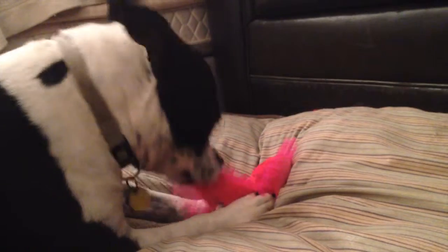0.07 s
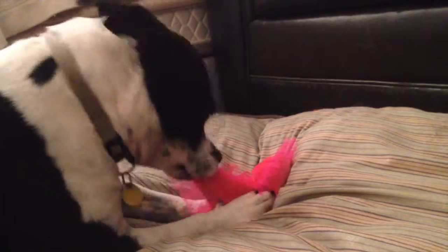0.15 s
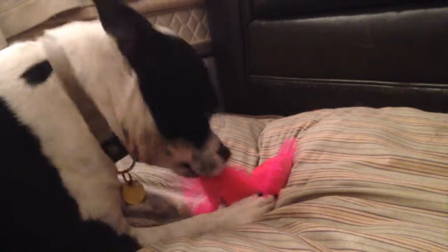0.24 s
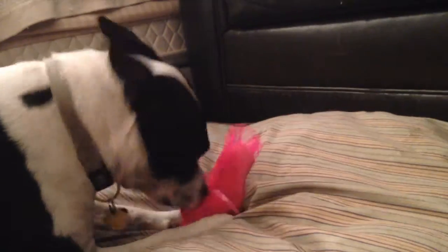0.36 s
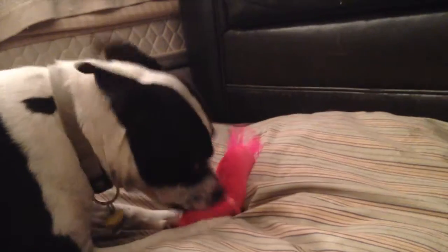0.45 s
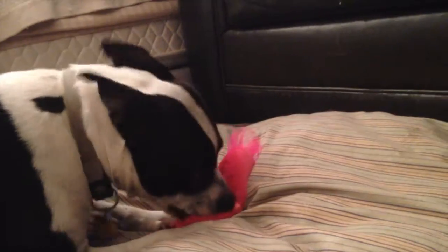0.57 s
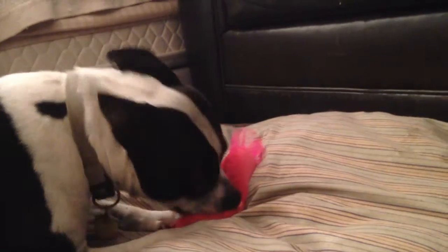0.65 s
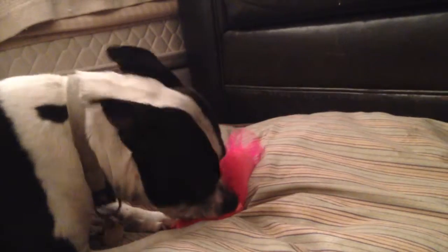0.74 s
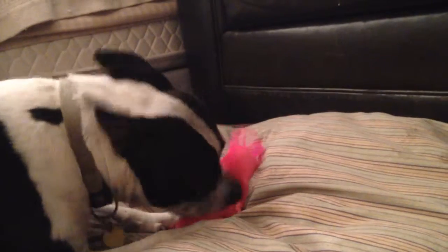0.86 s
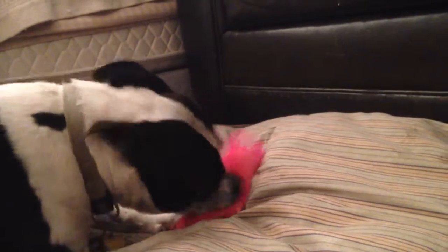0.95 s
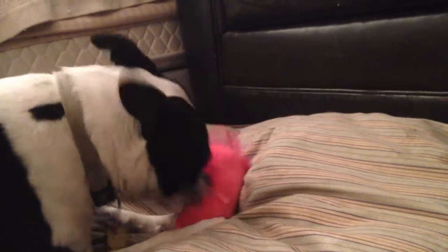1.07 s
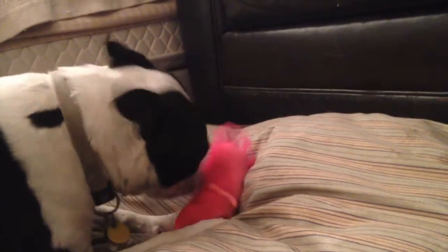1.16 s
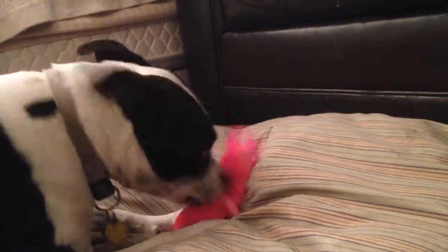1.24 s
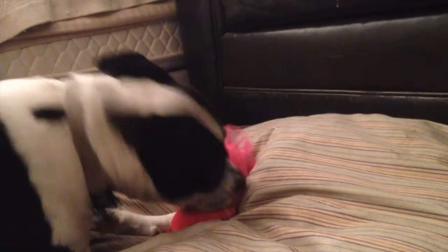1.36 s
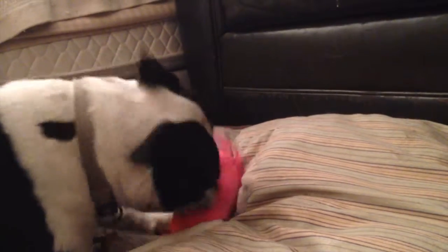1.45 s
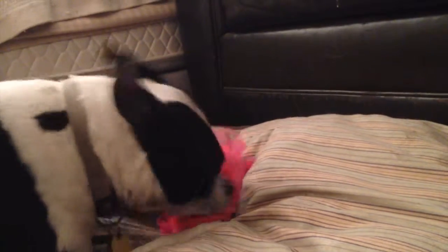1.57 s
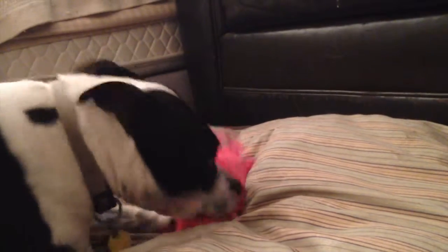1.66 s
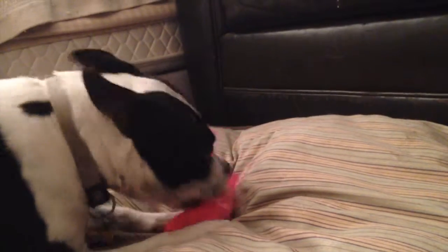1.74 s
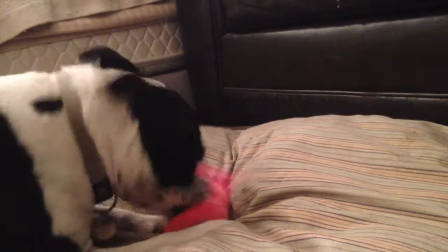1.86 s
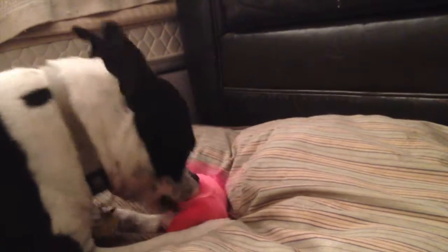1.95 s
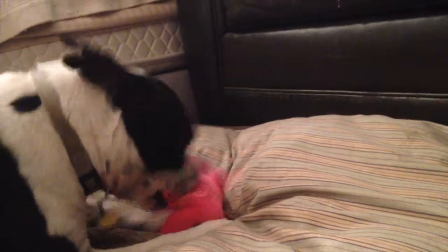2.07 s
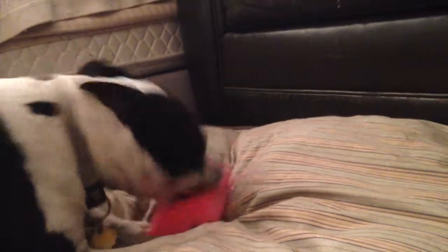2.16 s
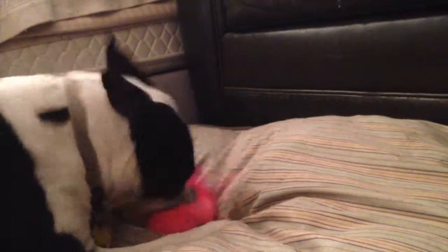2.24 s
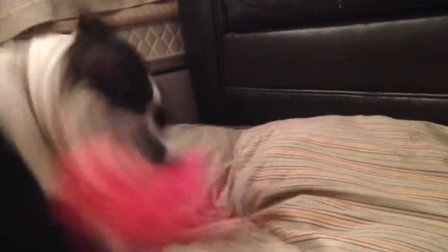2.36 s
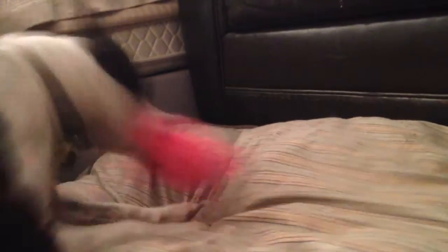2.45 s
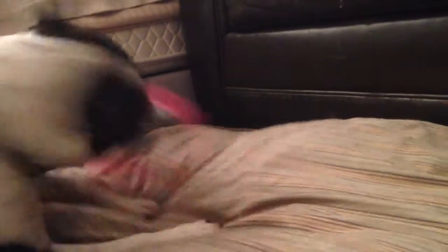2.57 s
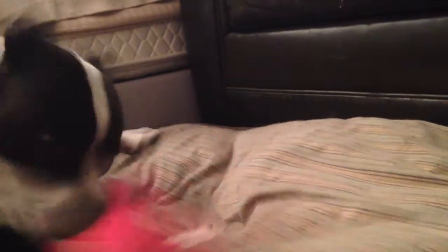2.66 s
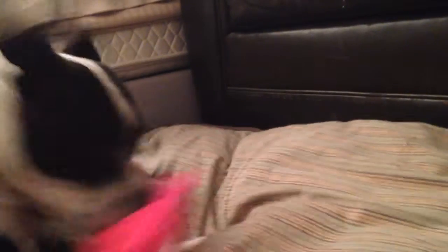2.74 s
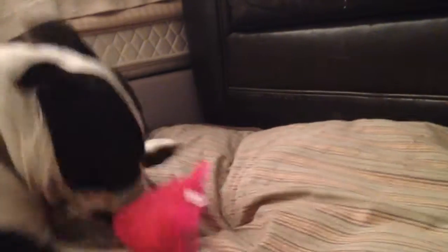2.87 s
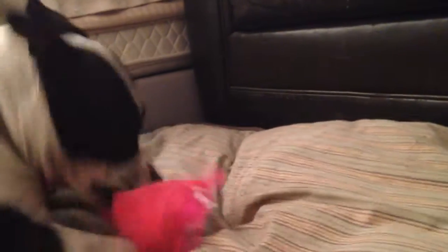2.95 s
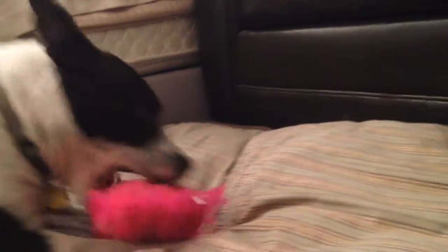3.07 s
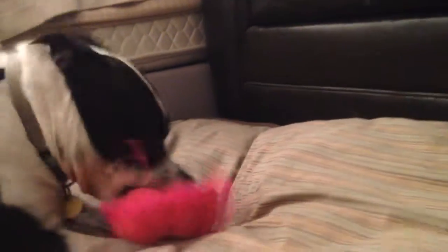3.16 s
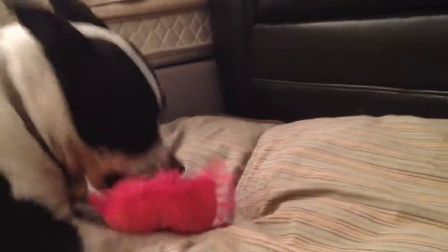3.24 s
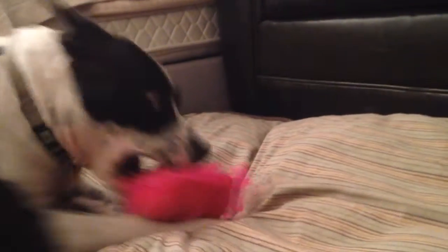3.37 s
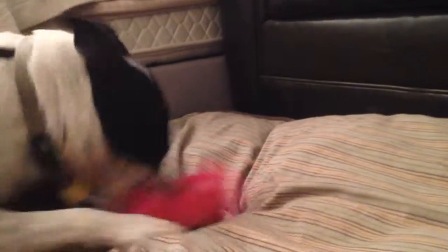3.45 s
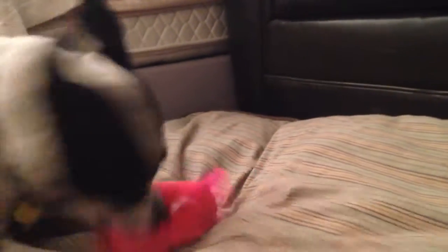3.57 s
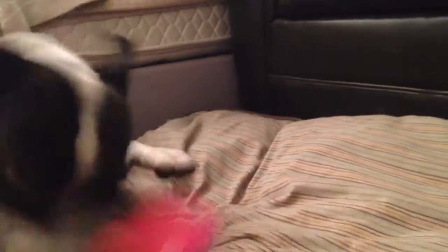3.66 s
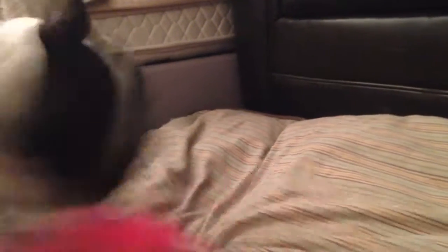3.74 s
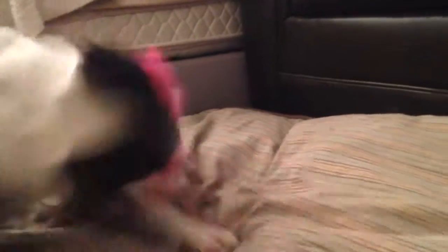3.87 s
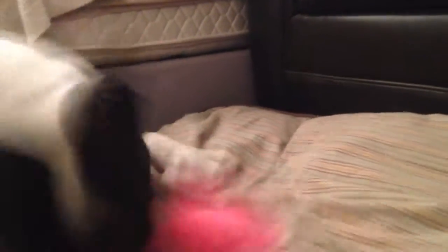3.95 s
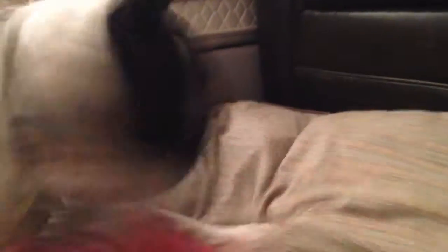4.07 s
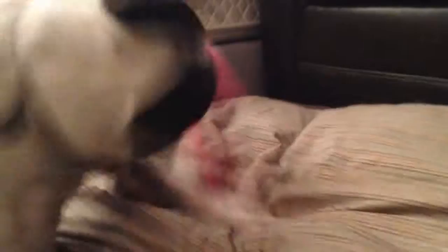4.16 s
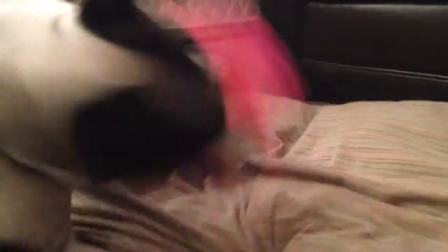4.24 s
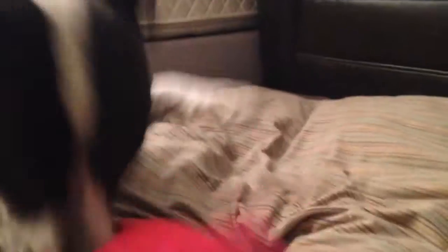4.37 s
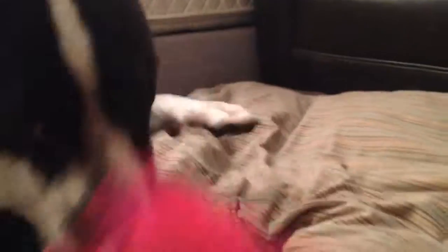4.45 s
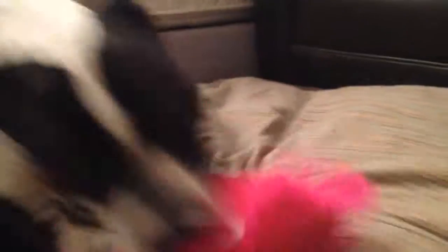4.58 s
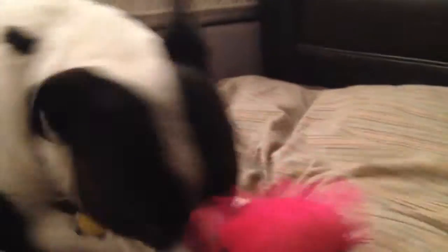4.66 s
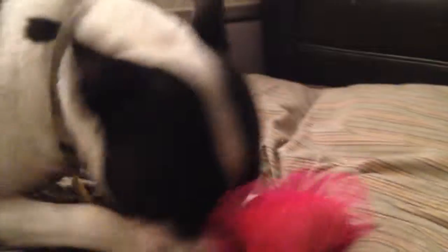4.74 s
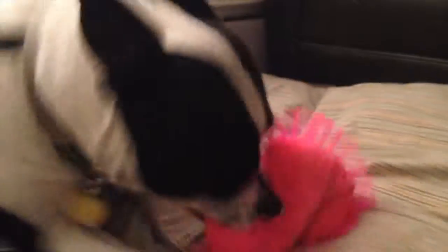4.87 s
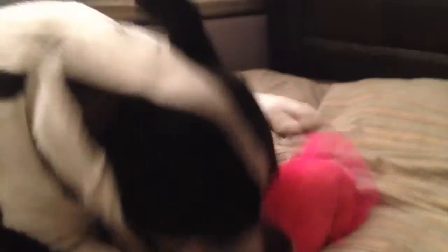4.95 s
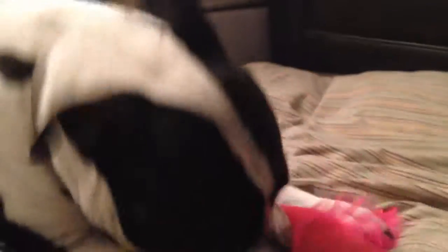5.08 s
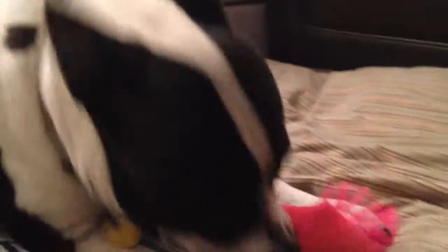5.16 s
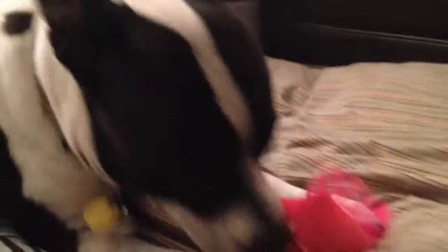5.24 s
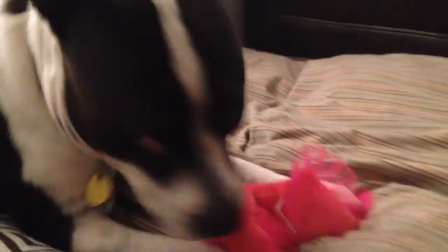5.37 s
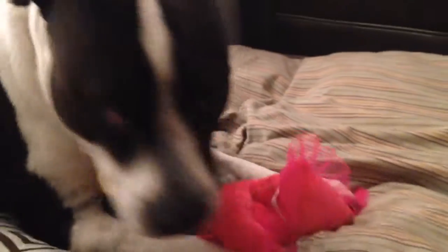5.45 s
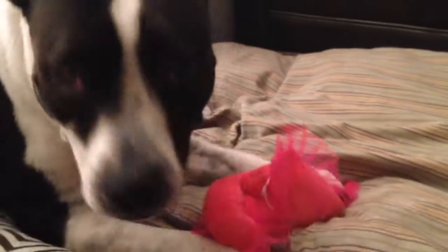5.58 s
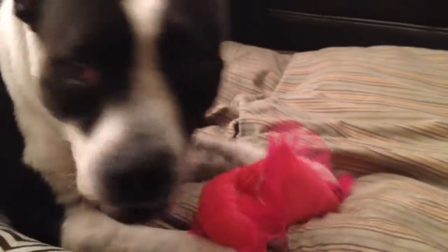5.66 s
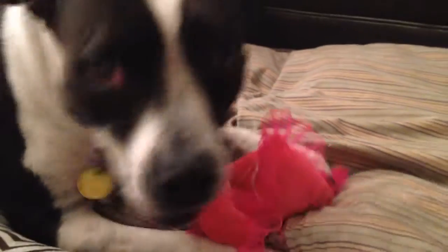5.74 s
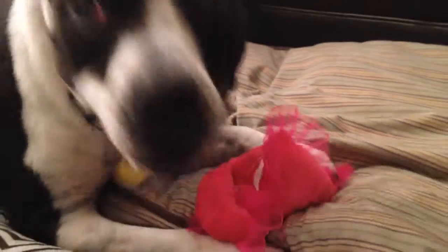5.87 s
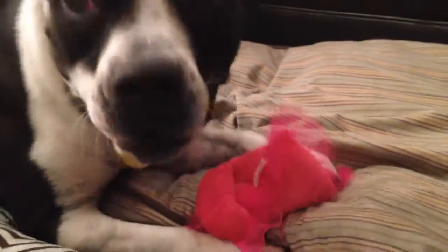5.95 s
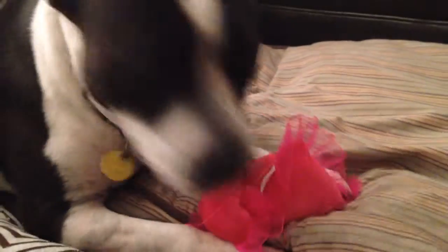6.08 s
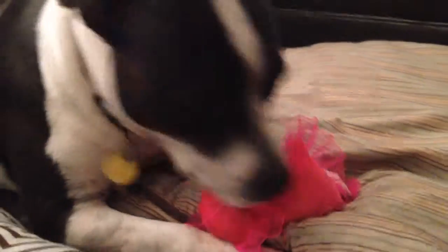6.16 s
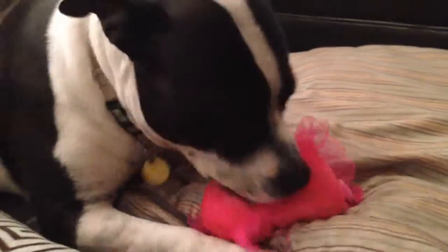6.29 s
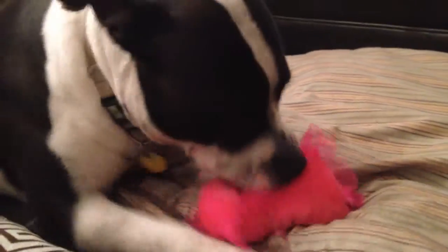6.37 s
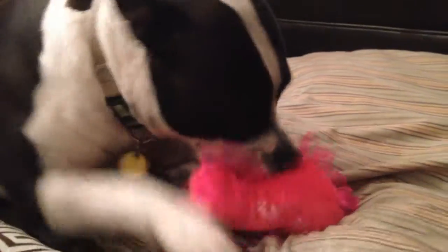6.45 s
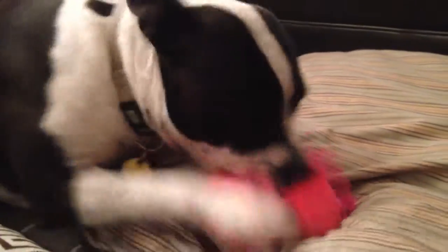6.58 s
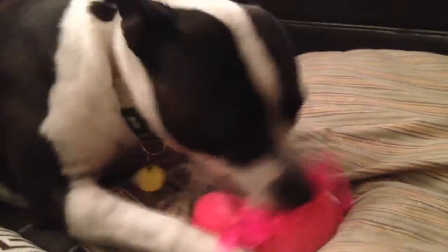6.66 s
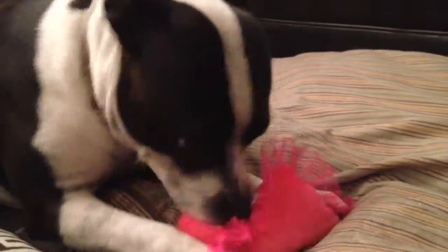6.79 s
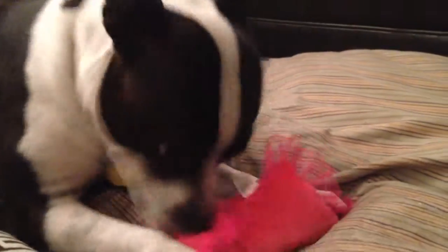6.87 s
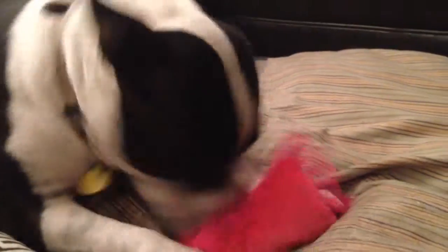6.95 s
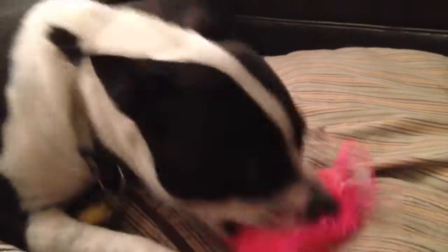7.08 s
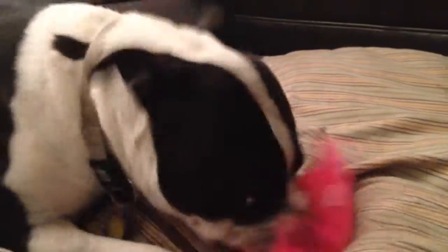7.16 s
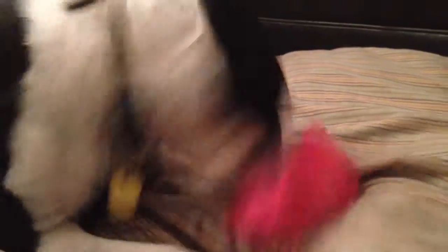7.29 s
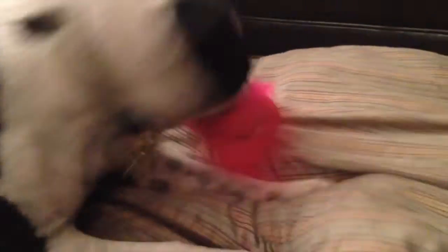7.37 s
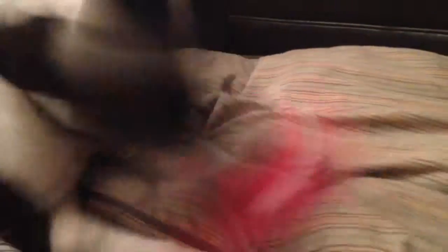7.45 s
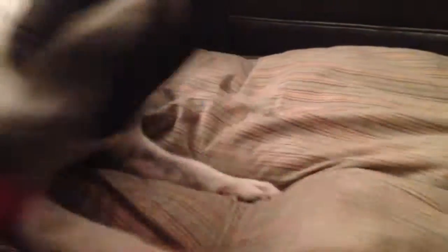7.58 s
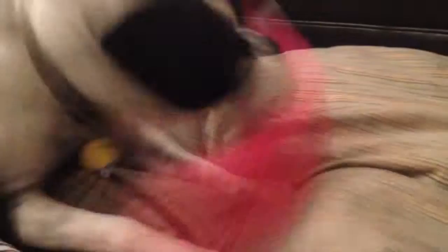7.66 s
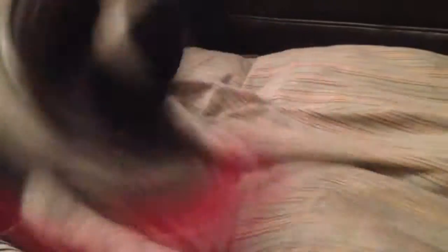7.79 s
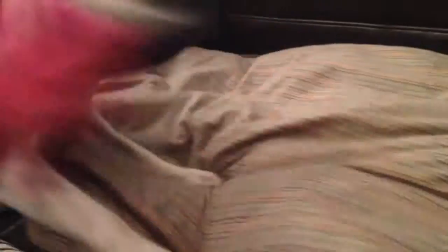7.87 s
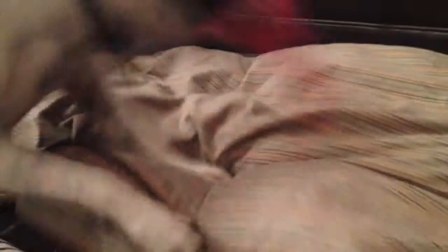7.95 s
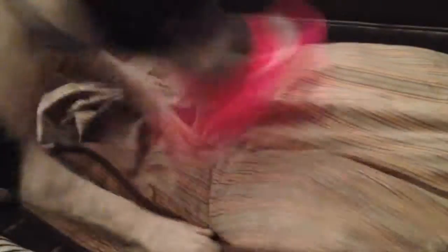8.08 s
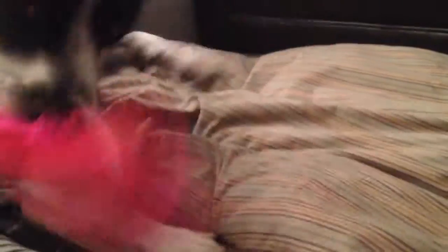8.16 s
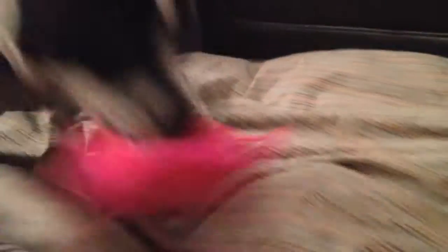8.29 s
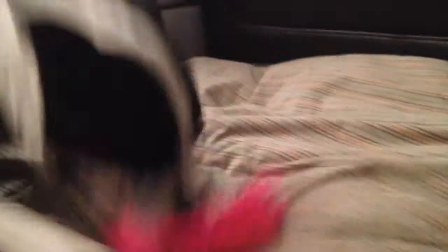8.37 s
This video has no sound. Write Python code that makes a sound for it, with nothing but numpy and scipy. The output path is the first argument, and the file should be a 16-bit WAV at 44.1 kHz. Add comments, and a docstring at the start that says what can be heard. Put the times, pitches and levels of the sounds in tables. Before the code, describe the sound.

Close, dry indoor pickup with low steady hiss and a short soft room tail. A faint jaw smack at 0.1 s and a soft nasal snort up to 0.4 s open. From 0.6 to 2.3 s small, bright collar-tag clinks come irregularly, with a faint bedding thump at 1.1. At 2.4-2.8 s a hard shake brings dense sharp jangling, dull toy slaps, cloth rustle and mattress thumps. Light clinks follow until a thump at 3.6, then renewed shaking from 3.8 to 4.4 s with loud ringing tags and heavy padded thuds; more jangles run from 4.7 to 5.2. A stronger airy snort comes at 5.2-5.5 s. It is then nearly quiet, with jaw clicks at 5.7-5.9 and 6.3-6.6. Clinks return at 6.7; from 7.1 the shaking builds, the fiercest rustle and jangle around 7.6, thumps near 8, and a loud clash at 8.1 before the end.

```python
"""A dog on a soft bed close by chews and shakes a plush toy, over a quiet room hiss of shaped noise.
A jaw smack (noise burst through two resonances) and a soft snort (noise through nostril resonances) open.
Collar tags (damped modes and a noise crack) clink from 0.6 s and ring harder in a shake from 2.4 to 5.2 s,
as cloth rustles (swelling noise) and the mattress thumps (low damped modes); a second snort follows.
A sparse stretch of clinks and smacks leads to another hard shake from 7 s to the end."""
import sys
import numpy as np
from scipy import signal
from scipy.fft import rfft, irfft, next_fast_len
from scipy.io import wavfile
from scipy.ndimage import uniform_filter1d, map_coordinates

SR = 44100
rng = np.random.default_rng(int(sys.argv[2]) if len(sys.argv) > 2 else 0)


def pcm_store(signal):
    """Save signal as 16-bit PCM."""
    levels = np.round(np.clip(np.atleast_2d(signal), -1, 1) * 32767)
    wavfile.write(sys.argv[1], SR, levels.astype(np.int16).T)


N = 371322


def amp(db):
    """Decibels to gain."""
    return 10 ** (np.asarray(db) / 20)


def unit(x):
    """Scaled to rms 1."""
    return x / np.sqrt(np.mean(x ** 2) + 1e-20)


def along(points, hz):
    """Interpolates (Hz, value) points on a log frequency axis."""
    f, v = np.transpose(points)
    return np.interp(np.log(hz + 1), np.log(f + 1), v)


def wobble(knots_per_s):
    """A smooth random curve through random knots."""
    knots = rng.standard_normal(int(N * knots_per_s / SR) + 4)
    return map_coordinates(knots, [np.arange(N) * knots_per_s / SR])


def filtered(x, response):
    """x through a complex response of frequency."""
    m = next_fast_len(N + SR // 2)
    return irfft(rfft(x, m) * response(np.fft.rfftfreq(m, 1 / SR)), m)[:N]


def rush(response, patchy_db):
    """Filtered noise of rms 1, its gain random in patches of time and frequency."""
    z = signal.stft(rng.standard_normal(N), nperseg=256)[2]
    field = uniform_filter1d(rng.standard_normal(z.shape), size=5, axis=0)
    field = uniform_filter1d(field, size=8, axis=1)
    patchy = signal.istft(z * amp(patchy_db * unit(field)), nperseg=256)[1][:N]
    return unit(filtered(patchy, response))


def add(track, s, sound):
    """Mixes a short sound in at s seconds."""
    part = track[round(s * SR):][:len(sound)]
    part += sound[:len(part)]


def ring(t, hz, t60_s, attack_s):
    """A damped mode with a short rise."""
    return np.sin(2 * np.pi * hz * t) * amp(-60 * t / t60_s) * (1 - np.exp(-t / attack_s))


# Hiss spectrum. Each row: frequency in Hz, relative level in dB.
HISS_SHAPE = [(15, -73), (25, -8.5), (81, 11), (328, -7), (396, -3.5), (2000, -12), (15200, -21)]
HISS_RMS_DB = -58.5


def hiss():
    """Room and microphone hiss: steady shaped noise."""
    return amp(HISS_RMS_DB) * rush(lambda hz: amp(along(HISS_SHAPE, hz)), patchy_db=2.4)


# Snorts. Each row: start in seconds, rise in seconds, fall in seconds, peak gain in dB, loss over the fall in dB.
SNORTS = [(.14, 0.14, 0.16, -47.5, 5.5), (5.193, 0.077, 0.25, -38.5, 18)]
SNORT_RISE_DB = 14.5


def breath():
    """Gain per sample of the snorts: rise and fall linear in dB, then cut."""
    t = np.arange(N) / SR
    gain = np.zeros(N)
    for s, rise_s, fall_s, db, loss_db in SNORTS:
        times = [s, s + rise_s, s + rise_s + fall_s]
        levels = [db - SNORT_RISE_DB, db, db - loss_db]
        gain += amp(np.interp(t, times, levels, left=-140, right=-140))
    return gain


# Nostril resonances. Each row: center in Hz, width in Hz, level in dB.
NOSTRIL_MODES = [(1480, 400, -7), (3710, 980, -1), (5640, 960, -6.5)]


def nostrils(hz):
    """Resonances of alternating sign plus a dull direct path."""
    total = amp(-3.5) / (1 + 1j * hz / 3500)
    for k, (center, width, db) in enumerate(NOSTRIL_MODES):
        band = 1j * hz * width / (center * center - hz * hz + 1j * hz * width)
        total = total + (-1) ** k * amp(db) * band
    return total


def nose():
    """Air forced through the nostrils hisses in their resonances."""
    return breath() * rush(nostrils, patchy_db=1.5)


# Toy swings over the bedding. Each row: loudest moment in seconds, rise in seconds, fall in seconds, gain in dB.
SWINGS = [(2.463, 0.073, 0.19, -40.5), (2.575, 0.086, 0.072, -45.5), (2.733, 0.099, 0.085, -47),
          (3.759, 0.1, 0.2, -44.5), (4.12, 0.51, 0.38, -48), (4.964, 0.2, 0.19, -54.5),
          (7.345, 0.049, 0.06, -53), (7.432, 0.043, 0.088, -38), (7.586, 0.078, 0.064, -33.5),
          (7.77, 0.19, 0.066, -48.5), (7.877, 0.029, 0.065, -49), (8.157, 0.38, 0.088, -46.5),
          (8.32, 0.099, 0.11, -54.5)]
SLOPE_DB = 17.5  # lost one rise before and one fall after the loudest moment


def swings():
    """Gain per sample: each swing swells and fades on a bell in dB."""
    t = np.arange(N) / SR
    gain = np.zeros(N)
    for s, rise_s, fall_s, db in SWINGS:
        offset = (t - s) / np.where(t < s, rise_s, fall_s)
        gain += amp(db - SLOPE_DB * offset ** 2)
    return gain


# Cloth spectrum. Each row: frequency in Hz, relative level in dB.
CLOTH_SHAPE = [(290, -9.5), (1300, -2.5), (3200, -4), (5430, -7), (12900, -15), (15500, -23)]


def rustle(stroke):
    """Cloth drags over cloth: grainy noise, brighter when louder."""
    grain = amp(2.6 * wobble(30) + 2.5 * wobble(400))
    dull = rush(lambda hz: amp(along(CLOTH_SHAPE, hz)) / (1 + (hz / 6000) ** 2), patchy_db=3.2)
    bright = rush(lambda hz: amp(along(CLOTH_SHAPE, hz)) / (1 + (5000 / (hz + 1)) ** 2), patchy_db=3.5)
    return unit(grain) * (stroke * dull + amp(22) * stroke ** 1.357 * bright)


CRACKLE_PER_S, CRACKLE_DB = 300, -3  # mean rate; level relative to the swing gain


def crackle():
    """Sparse fibre snaps of very uneven size, band-passed, rms 1."""
    when, size = rng.random(N), rng.standard_normal(N)
    snaps = (when < CRACKLE_PER_S / SR) * size * amp(4 * rng.standard_normal(N))
    return unit(filtered(snaps, lambda hz: 1j * hz / (1500 + 1j * hz) / (1 + 1j * hz / 7000)))


# Padded flapping spectrum. Each row: frequency in Hz, relative level in dB.
MATTRESS_SHAPE = [(20, -62.5), (45, -26), (62, 1.5), (85, -4), (146, -12), (1200, -29.5), (2640, -120)]
FLAP_DB, FLAP_EXPONENT = -13.5, 0.59  # exponent: how far it follows the swing gain


def flapping(stroke):
    """Padded low noise that follows the swings less steeply than the rustle."""
    rumble = rush(lambda hz: amp(along(MATTRESS_SHAPE, hz)), patchy_db=5.5)
    return amp(FLAP_DB) * stroke ** FLAP_EXPONENT * rumble


# Toy and paws landing. Each row: start in seconds, level in dB before THUMP_GAIN_DB, frequency in Hz.
THUMPS = [(1.124, -48, 91), (2.455, -33, 96), (2.531, -30, 98.5), (3.6, -36, 86), (3.807, -26.5, 91),
          (4.018, -27.5, 86.5), (4.116, -24.5, 77), (4.632, -29.5, 86.4), (4.954, -28, 88.5),
          (7.934, -21.5, 87), (8.052, -28, 110.7)]
THUMP_GAIN_DB = 22


def thumps():
    """The mattress answers each landing with a low damped swing and its overtone."""
    out, t = np.zeros(N), np.arange(SR // 3) / SR
    for s, db, hz in THUMPS:
        swing = ring(t, hz, t60_s=0.12, attack_s=0.022)
        overtone = 0.19 * ring(t, 1.9 * hz, t60_s=0.08, attack_s=0.018)
        add(out, s, amp(db + THUMP_GAIN_DB) * (swing + overtone) * (1 - np.exp(-t / 0.016)))
    return out


def bedding():
    """Rustle, fibre snaps and flapping share the swing gain; thumps are added."""
    stroke = swings()
    return rustle(stroke) + amp(CRACKLE_DB) * stroke * crackle() + flapping(stroke) + thumps()


# Jaw smacks and toy slaps. Each row: start in seconds, knock peak in dB, frequency in Hz.
SMACKS = [(0.076, -38, 1620), (2.416, -24.5, 433), (2.551, -18.5, 303), (2.72, -23, 510),
          (3.77, -28.5, 456), (4.022, -22.5, 387), (4.047, -25, 2900), (4.368, -22, 670),
          (4.612, -28.5, 583), (5.714, -40, 1950), (5.8527, -25.5, 1574), (6.318, -35.5, 541),
          (6.624, -39.5, 1994), (6.988, -34, 2470), (7.106, -29, 422), (7.31, -35.5, 415),
          (7.786, -24.5, 1660), (7.858, -23.5, 388), (8.097, -27, 2800), (8.209, -21, 2080)]


def jaws():
    """A noise burst knocks through two broad cavity resonances, with a crisp snap on top."""
    out, t = np.zeros(N), np.arange(SR // 16) / SR
    for s, db, hz in SMACKS:
        burst = rng.standard_normal(len(t)) * amp(-60 * t * (hz + 400) / 30)  # deeper knocks last longer
        cavity = ring(t, hz, 6 / hz, 0.000094) + 0.46 * ring(t, 0.45 * hz, 8 / hz, 0.00076)
        knock = np.convolve(burst, cavity)[:len(t)]
        snap = uniform_filter1d(burst, size=19) - uniform_filter1d(burst, size=150)
        snap = snap * amp(-60 * t / 0.011)
        add(out, s, amp(db) * (knock / np.abs(knock).max() + 1.6 * snap))
    return out


def choke(t):
    """Full ring until the tag meets the fur, a faint one after."""
    touch_s = 0.011 * amp(2.2 * rng.standard_normal())
    return 0.13 + 1 / (1 + np.exp(np.clip((t - touch_s) / 0.002, -30, 30)))


MAIN_HZ, MAIN_T60_S = 9350, 0.13  # rung by every contact
# Quickly damped side modes of the tags. Each entry: frequency in Hz.
SIDE_HZ = [5590, 5945, 6570, 7245, 13440, 13970, 14350]
SIDE_DB, SIDE_T60_S = -9, 0.026  # level relative to the contact


def clink(t, main_db, crack_db):
    """One contact: a bright crack, the main mode, and side modes struck anew each time."""
    strike, detune = rng.standard_normal((2, len(SIDE_HZ), 1))
    skid = amp(crack_db - 60 * t / 0.009) * (1 - np.exp(-t / 0.0004))
    crack = skid * np.diff(rng.standard_normal(len(t) + 1))
    share = amp(11 * strike)
    side_hz = np.c_[SIDE_HZ] * (1 + 0.012 * detune)
    side = np.sum(share * ring(t, side_hz, SIDE_T60_S, 0.0001), axis=0) / np.linalg.norm(share)
    main_hz = MAIN_HZ * (1 + 0.0018 * rng.standard_normal())
    main = choke(t) * ring(t, main_hz, MAIN_T60_S, 0.0001)
    return crack + amp(SIDE_DB) * side + amp(main_db) * main


FIDGETS_PER_S, FIDGET_DB = 30, -57  # mean rate; base level outside the swings


def fidgets():
    """Faint stray touches of the tags scattered around the contacts, harder during a shake."""
    out, t, shaking = np.zeros(N), np.arange(SR // 16) / SR, swings()
    for pick, when, size in rng.random((round(FIDGETS_PER_S * N / SR), 3)):
        s = CLINKS[int(pick * len(CLINKS))][0] + 0.3 * (when - 0.4)
        force = amp(FIDGET_DB) + amp(5) * shaking[min(round(s * SR), N - 1)]
        touch = clink(t, rng.normal(-12, 8), crack_db=6)
        add(out, s, force * amp(14 * (size - 0.5)) * touch)
    return out


# Glancing blows that let one side mode ring. Each row: start in seconds, frequency in Hz, level in dB.
PINGS = [(1.6077, 5825, -30.5), (1.6073, 13970, -26), (1.9543, 5945, -40.5), (2.124, 14250, -20),
         (2.4605, 13440, -43), (2.549, 13970, -13), (2.581, 13400, -13.5), (3.909, 7245, -11.5),
         (4.166, 6000, -27), (4.167, 14350, -36), (4.2714, 6470, -30), (4.7624, 13440, -37),
         (4.9076, 13900, -21), (4.984, 5930, -32), (4.99, 14300, -20), (5.1738, 5600, -29.5),
         (7.1228, 14000, -21.5), (7.7366, 13440, -20), (7.8157, 13950, -26), (8.037, 7290, -20.5)]
PING_T60_S = 0.061


def pings():
    """A single side mode rings on until the fur chokes it, later than in a clink."""
    out, t = np.zeros(N), np.arange(SR // 8) / SR
    for s, hz, db in PINGS:
        add(out, s, amp(db) * choke(t / 2) * ring(t, hz, PING_T60_S, 0.0005))
    return out


# Tag contacts. Each row: start in seconds, level in dB, main mode relative to that level in dB.
CLINKS = [(0.615, -41, -17), (0.636, -35.5, -26), (0.6776, -28, -13), (0.9351, -32, -14), (1.035, -41, -25),
          (1.118, -41.5, -14), (1.51, -37.5, -5), (1.5228, -31, -4), (1.6083, -27, -18),
          (1.637, -29.5, -13), (1.9105, -32, 8.5), (1.945, -31, -25), (2.0072, -44.5, -6), (2.0248, -44, 0),
          (2.1239, -31, 3), (2.222, -29.5, -2), (2.2445, -27, 4), (2.2587, -30.5, -15),
          (2.3467, -31.5, -9.5), (2.4604, -11.5, -11), (2.5326, -17, -4.5), (2.5454, -16, -2.5),
          (2.581, -11, -6.5), (2.6402, -15.5, -7.5), (2.7506, -28, 3.5), (2.793, -31, -7.5),
          (3.127, -31.5, -10), (3.188, -42, -28), (3.378, -40.5, -25), (3.4716, -49.5, -2.5),
          (3.5448, -38.5, -27), (3.9005, -22, 1), (3.907, -9.5, -0.5), (3.9942, -24.5, -1.5),
          (4.0625, -30.5, 6), (4.0995, -30, 4), (4.167, -31.5, -25), (4.2126, -22, 2), (4.236, -10, 1),
          (4.252, -25, 9), (4.2714, -11, -8), (4.2845, -26.5, -5), (4.3003, -13, -8.5), (4.4156, -36, -15),
          (4.7043, -22.5, -9), (4.7211, -26.5, -17), (4.731, -24, -20), (4.762, -35.5, 8.5),
          (4.87, -26, -12), (4.9086, -15.5, 3), (4.917, -19.5, -22), (4.9818, -19, -15), (5.0342, -22, -15),
          (5.0617, -15, -12), (5.0846, -23, -22), (5.1738, -32.5, 1), (5.19, -30.5, -8), (5.4392, -31, -10),
          (6.7186, -32.5, -12), (6.8143, -32.5, -5), (6.893, -36, -7), (6.9575, -29.5, -14),
          (7.1227, -20, -9), (7.2211, -31.5, -51), (7.4063, -32, -10), (7.455, -28, -5), (7.473, -22.5, 1),
          (7.5026, -19.5, -15), (7.5084, -16, -1.5), (7.5836, -13, -8), (7.591, -8.5, -19),
          (7.6065, -6.5, -23), (7.6806, -27, -1.5), (7.7355, -26, 13), (7.801, -20.5, -7),
          (7.8157, -16, -5.5), (7.9064, -20.5, -5.5), (7.9971, -25, 2.5), (8.0392, -17, -2.5),
          (8.0696, -14, 3), (8.074, -4.5, -12.5), (8.2482, -24, -16)]


def clinks():
    """Tag strikes tag: each contact has a weaker rebound 4 to 10.4 ms later."""
    out, t = np.zeros(N), np.arange(SR // 8) / SR
    for s, db, main_db in CLINKS:
        delay, weak = rng.random(2)
        add(out, s, amp(db) * clink(t, main_db, crack_db=3))
        rebound = clink(t, main_db - 6.5, crack_db=-0.5)
        add(out, s + 0.004 + 0.0064 * delay, amp(db - 2.5 - 12 * weak) * rebound)
    return out


def room(x):
    """A short, soft tail off furniture and walls: decaying noise after a 130-sample delay."""
    t = np.arange(SR // 5) / SR
    tail = rng.standard_normal(len(t)) * amp(-60 * t / 0.11)
    return signal.fftconvolve(np.pad(x, (130, 0)), tail / np.linalg.norm(tail))[:N]


def scene():
    """All sources, the sharp ones with their echo."""
    near = fidgets() + jaws() + pings() + clinks()
    echo = amp(-12) * room(near)
    return (hiss() + nose() + bedding() + near + echo)[None]


TOP_HZ = 16400


def record(dry):
    """The microphone falls off above 15 kHz, and nothing passes above the band limit."""
    def response(hz):
        """Treble loss of 0.03 dB per Hz, then a sharp cut."""
        return amp(-0.03 * np.maximum(hz - 15000, 0)) * (hz < TOP_HZ)
    return filtered(dry[0], response)[None]


dry = scene()
out = record(dry)
pcm_store(out)
```